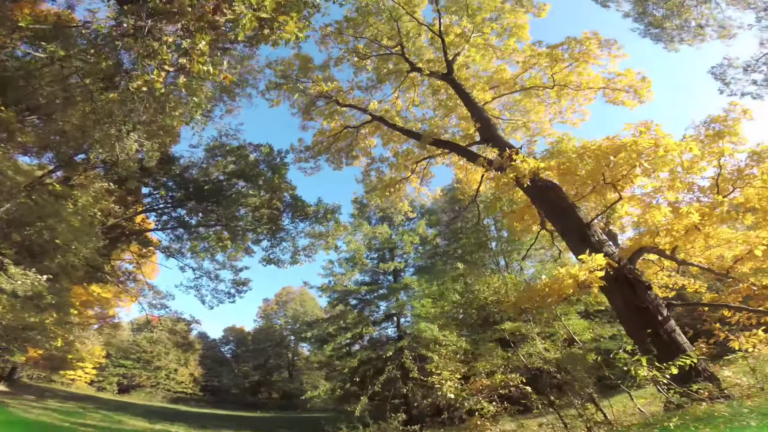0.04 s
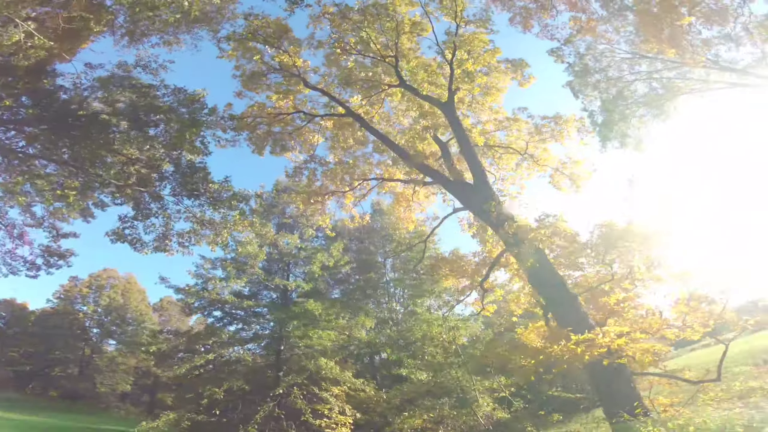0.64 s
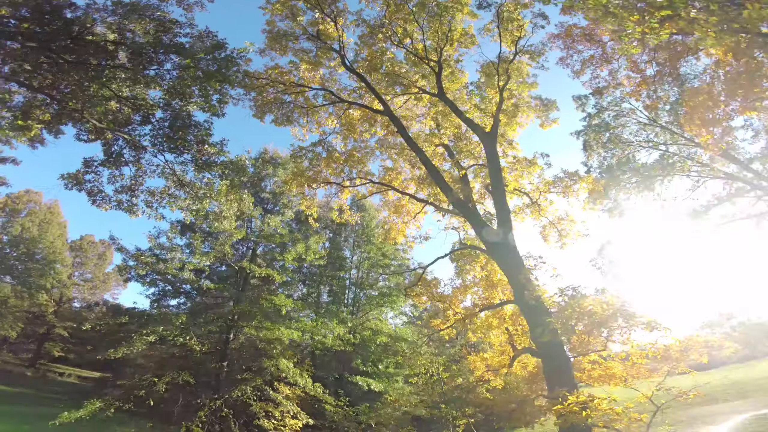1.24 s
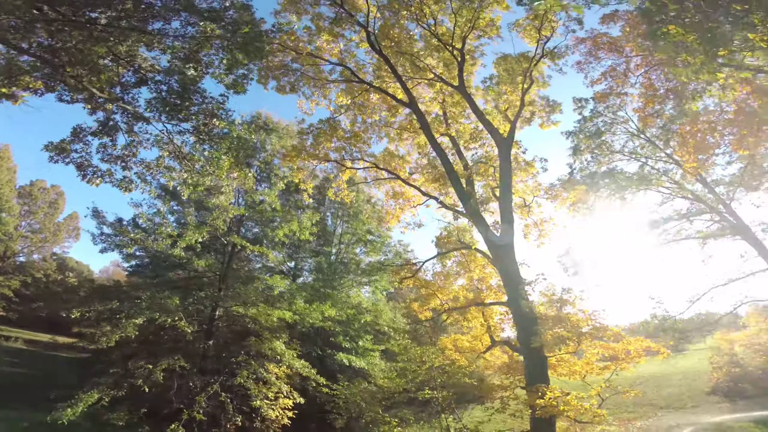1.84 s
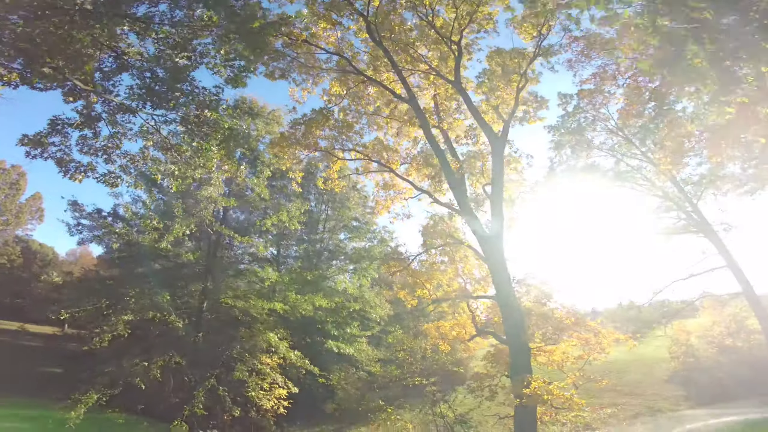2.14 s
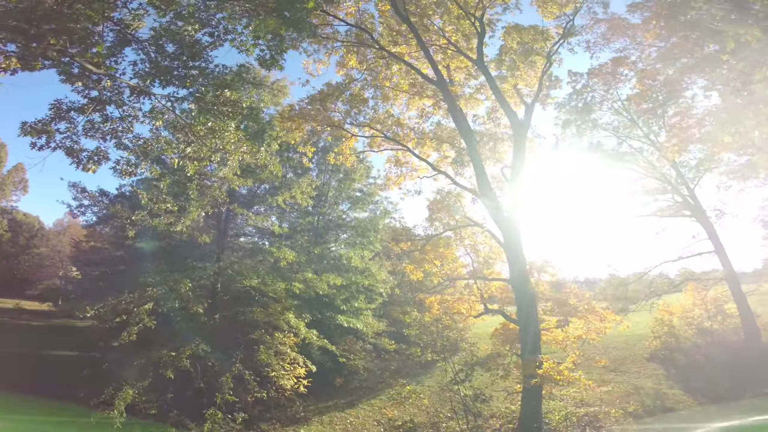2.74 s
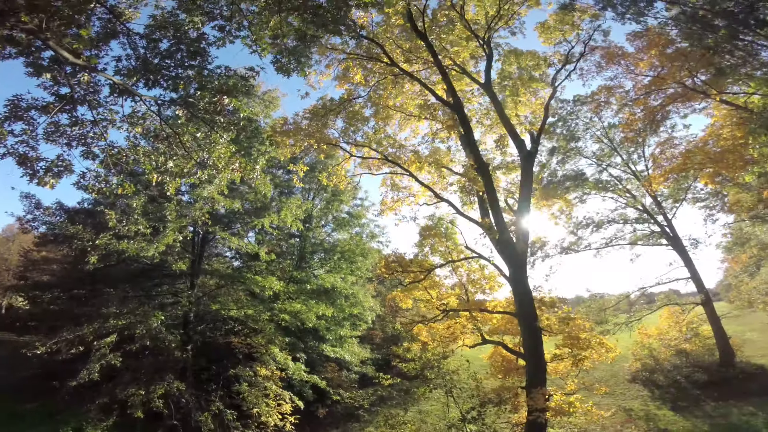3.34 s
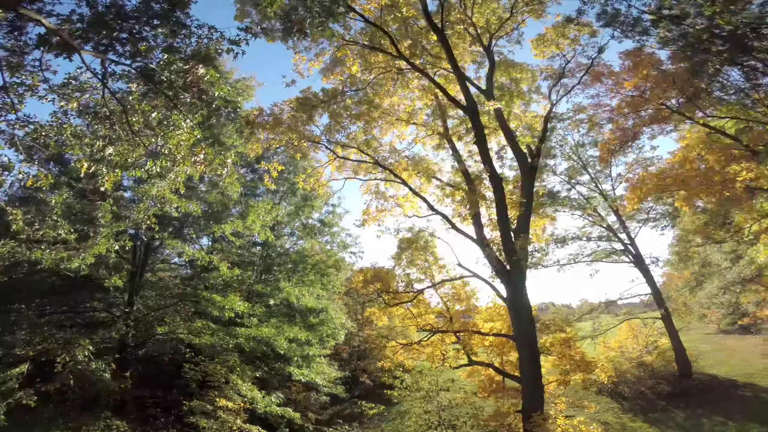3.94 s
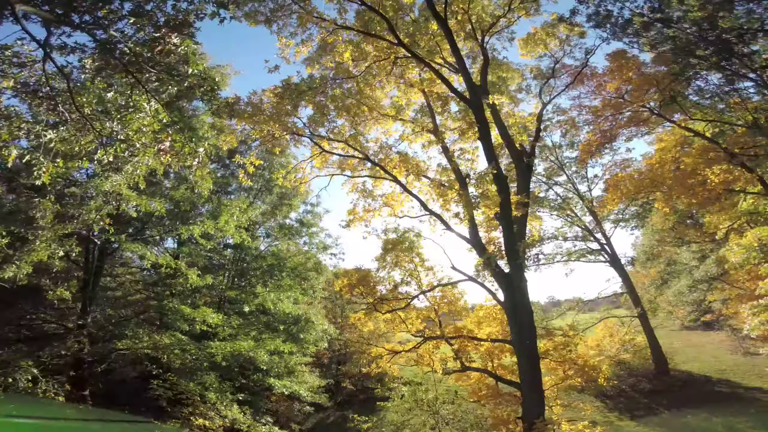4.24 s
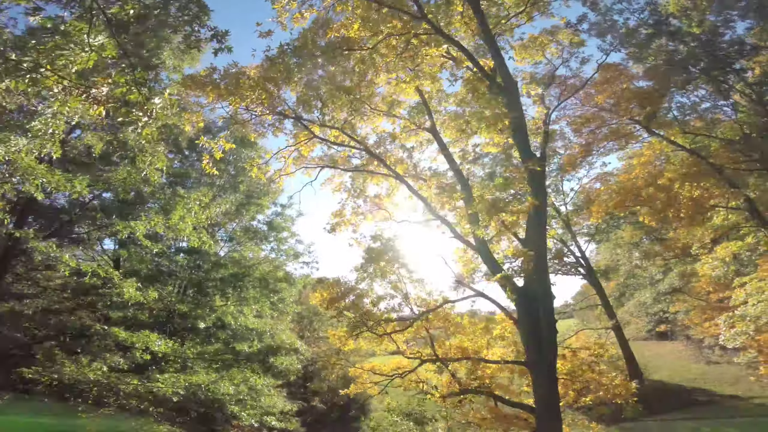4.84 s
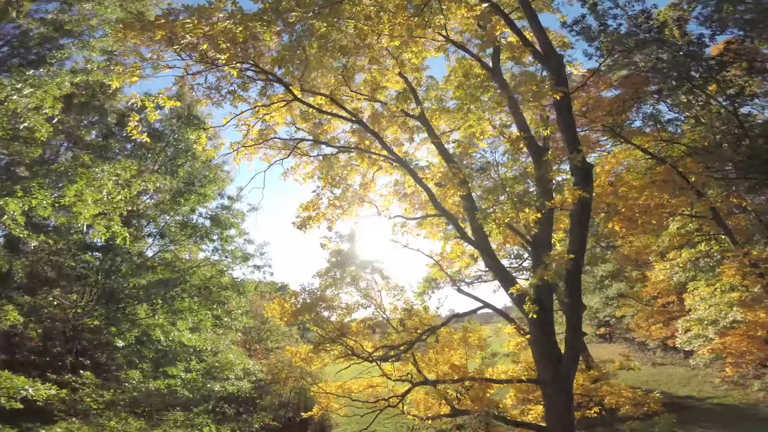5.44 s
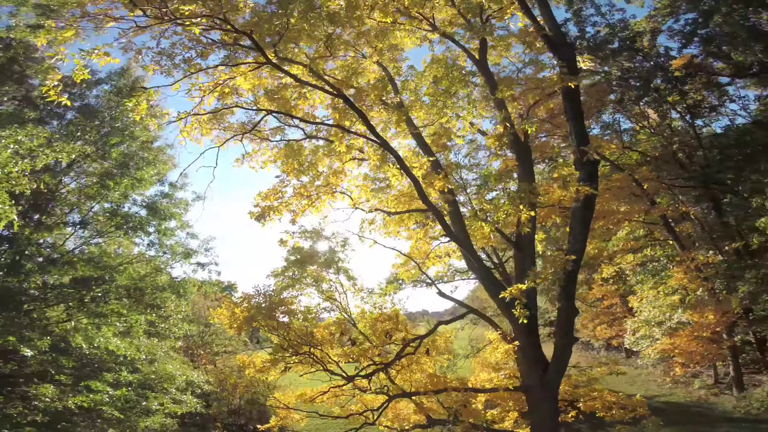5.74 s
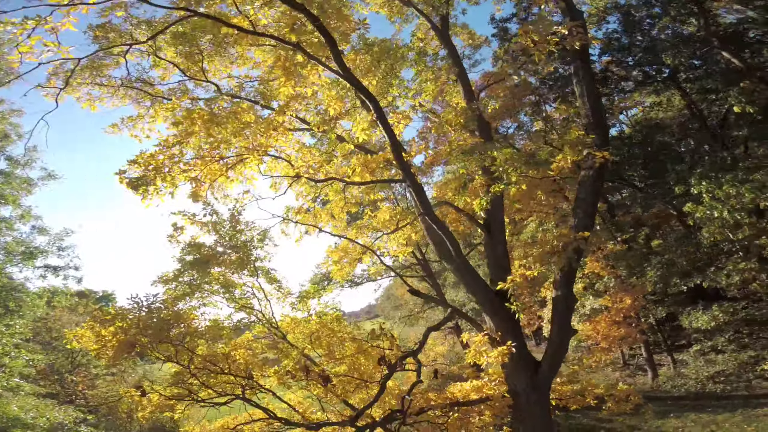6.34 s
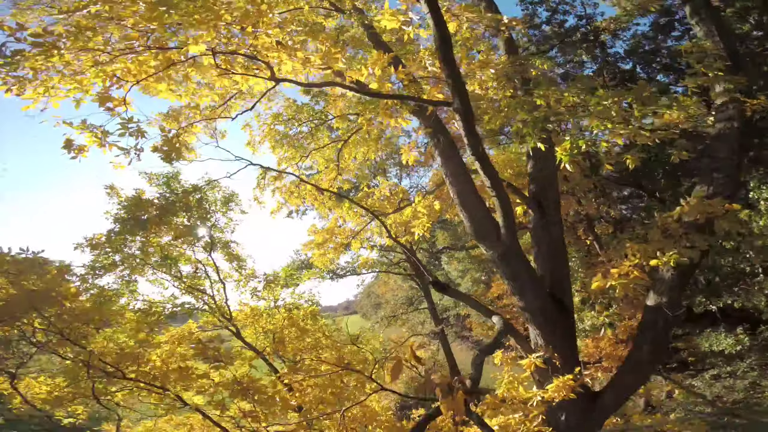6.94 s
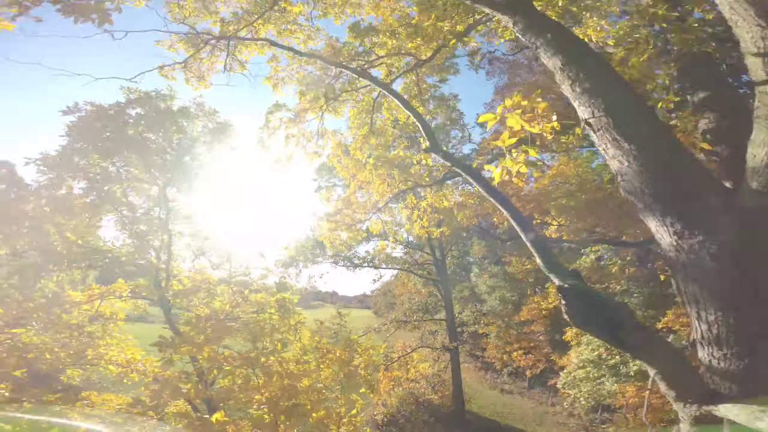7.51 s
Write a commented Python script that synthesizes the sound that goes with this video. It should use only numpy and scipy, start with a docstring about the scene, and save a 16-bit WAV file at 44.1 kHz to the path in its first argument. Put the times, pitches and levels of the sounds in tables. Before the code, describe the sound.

A small drone's propellers buzz and whine up close, wavering in pitch with the throttle, over low wind rumble.

```python
"""Outdoors among trees, riding with the camera on the frame of a small quadcopter in flight.
The throttle moves in steps; four motors at slightly different speeds shake the frame and beat against
each other. Their three-bladed propellers chop the air into low tones and a rasping buzz, and the magnets
add a thin whine. Wind rumbles on the microphone underneath, and the blade tips hiss on top."""
import sys
import numpy as np
from scipy import signal
from scipy.fft import rfft, irfft, next_fast_len
from scipy.io import wavfile
from scipy.ndimage import uniform_filter1d, minimum_filter1d, map_coordinates

SR = 44100
rng = np.random.default_rng(int(sys.argv[2]) if len(sys.argv) > 2 else 0)


def int16_out(signal):
    """Quantize to a 16-bit WAV file."""
    q = np.round(np.clip(np.atleast_2d(signal).T, -1, 1) * 32767)
    wavfile.write(sys.argv[1], SR, q.astype(np.int16))


N = 338247


def amp(db):
    """Decibels to gain."""
    return np.exp(np.asarray(db) * np.log(10) / 20)


def unit(x):
    """Scale to rms 1."""
    return x / np.sqrt(np.mean(x ** 2) + 1e-20)


def curves(rows):
    """One automation curve for each column after the time."""
    times, *columns = np.transpose(rows)
    return [np.interp(np.arange(N) / SR, times, column) for column in columns]


def wobble(rate):
    """Smooth random modulation, rate knots a second."""
    coarse = np.linspace(0, N, num=8192)
    knots = rng.standard_normal(8192)
    return np.interp(np.arange(N), coarse, map_coordinates(knots, [coarse * rate / SR], mode="wrap"))


def filtered(x, response):
    """Filter x by a gain given as a function of frequency."""
    size = next_fast_len(N + SR // 2)
    return irfft(rfft(x, size) * response(np.fft.rfftfreq(size, 1 / SR)), size)[:N]


def eq(x, points):
    """Shape x with an EQ curve of (frequency [Hz], gain [dB]) points."""
    freqs, db = np.transpose(points)
    return filtered(x, lambda hz: amp(np.interp(np.log(hz + 1), np.log(freqs), db)))


def noise(spectrum):
    """Noise of rms 1, coloured by an EQ curve."""
    return unit(eq(rng.standard_normal(N), spectrum))


def tone(angle):
    """A sinusoid of rms 1."""
    return np.sqrt(2) * np.cos(angle)


def overtones(angle, orders, smear, flutter_db):
    """Fluttering harmonics of one shaft, blurred by turbulence, the high ones most."""
    angle = angle + smear * wobble(110)
    return sum(amp(db + flutter_db * wobble(35)) * tone(round(k) * angle + rng.uniform(0, 2 * np.pi))
               for k, db in orders)


def chopped_noise(spectrum, angles, blade_db, turn_db, gust_db):
    """Turbulence that pulses with every blade, every turn of the first shaft and every gust."""
    passes = unit(sum(np.cos(3 * angle) for angle in angles))
    swell_db = blade_db * passes + turn_db * tone(angles[0]) + gust_db * wobble(35)
    return unit(amp(swell_db) * noise(spectrum))


# Throttle moves, each held until the next: (time [s], first motor's speed [turns/s], drift [turns/s^2])
THROTTLE_MOVES = [(0, 175, -12), (.33, 172, 12), (.58, 175, -5), (.99, 163, -6), (1.4, 165.5, 8),
                  (1.585, 178.5, 2), (2.125, 165, -3), (2.54, 173, 10), (2.75, 175, -13), (3.3, 167.7, 0),
                  (4.145, 157.5, -17), (4.36, 159.7, -4), (4.86, 163.3, 8), (5.15, 163.3, -3),
                  (5.75, 154, -7), (6.53, 160.5, 0), (7.18, 142, -13)]
# Detune from the first motor that holds the attitude and sets the beat rate: (time [s], lead [turns/s])
SECOND_DETUNE = [(0, 25.91), (.15, 24.75), (.6, 9.87), (1.35, 1.59), (1.5, 10.89), (1.65, 4.69),
                 (2.35, 4.07), (2.9, 10.55), (3.15, 15.75), (4, 21.99), (4.4, 21.45), (4.65, 24.61),
                 (5.3, 26.42), (5.8, 25.46), (6.55, 29.56), (7.05, 35.53), (7.67, 36.1)]
THIRD_DETUNE = [(0, 37), (.5, 37), (1, 18), (1.3, 12), (1.7, -9), (2.05, -8), (2.25, 8), (2.7, 5),
                (3.3, 21), (5, 35), (5.65, 30), (5.85, 50), (6.45, 51), (7.05, 41), (7.67, 46)]
FOURTH_DETUNE = [(0, -17), (.2, -9), (.42, 1), (6.45, 2), (7.1, 7), (7.67, 4)]

def motor_speeds(spool_s=.018):
    """Turns per second of four motors: the first glides after the throttle, the rest lead or trail it."""
    t = np.arange(N) / SR
    moves = np.array(THROTTLE_MOVES)
    start, target, drift = moves[np.searchsorted(moves[:, 0], t, side="right") - 1].T
    demand = target + drift * (t - start)
    lag = np.exp(-1 / (spool_s * SR))
    first = demand[0] + signal.lfilter([1 - lag], [1, -lag], demand - demand[0])
    return [first] + [first + curves(lead)[0] for lead in (SECOND_DETUNE, THIRD_DETUNE, FOURTH_DETUNE)]


# Airflow through the propellers:
# (time [s], clean bite over wash [dB], shaft-angle churn [rad], body level [dB], hiss level [dB])
AIRFLOW = [(0, 1, 0.11, -23, -33.5), (.35, -4, 0.038, -27.5, -33), (.9, 1.5, .04, -28.5, -32.5),
           (1.08, 1.5, 0.069, -27.5, -31.5), (1.47, 1, 0.06, -24.5, -29.5), (2.1, 0.5, 0.035, -28.5, -32),
           (2.45, 4.5, 0.034, -26, -31.5), (2.7, 0.5, .05, -27, -29.5), (4.05, 3, 0.056, -26, -31),
           (4.35, -3, .04, -25, -30.5), (5.7, 2, 0.049, -25.5, -30.5), (6.35, -1, .06, -21, -30.5),
           (6.7, -0.5, 0.061, -25, -31.5), (7.17, 3, .07, -21.5, -31), (7.3, -6, .075, -24, -32),
           (7.67, -9, 0.036, -24.5, -29)]

def propeller_bites(speeds):
    """How hard each propeller bites: load shifts to the second as it leads; the fourth works to catch up."""
    bite_db = curves(AIRFLOW)[0]
    shift_db = 0.1778 * (speeds[1] - speeds[0])
    catch_up_db = 0.9 * np.maximum(speeds[0] - speeds[3], 0)
    trims_db = [2 - shift_db, -6.5 + shift_db, -6, -4.5 + catch_up_db]
    return amp([bite_db + trim for trim in trims_db])


# How the frame passes on the shake of the first two motors: (speed [turns/s], level [dB])
FIRST_SHAKE = [(136, -17), (149, -12), (155, -10), (162, -13), (168, -13), (174, -12), (180, -9.5)]
SECOND_SHAKE = [(162, -20.5), (172, -20), (182, -14.5), (187, -12), (196, -11.5), (203, -17)]

def frame_hum(speeds, angles, bites):
    """Unbalanced rotors shake the frame once a turn; rough air makes the hum ragged."""
    _, churn, _, hiss_db = curves(AIRFLOW)
    load = amp(0.69 * (hiss_db - hiss_db.mean()))  # the airflow loads the arms
    levels_db = [np.interp(speeds[0], *np.transpose(FIRST_SHAKE)),
                 np.interp(speeds[1], *np.transpose(SECOND_SHAKE)),
                 curves(SECOND_THIRD_BLADE_LEVELS)[1] + 0.5,  # the third follows its blade tone
                 -27]  # the fourth is well balanced
    shakes = [load * amp(db + 1.8 * unit(churn) * wobble(25)) * tone(angle)
              for db, angle in zip(levels_db, angles)]
    # the mount gives more one way than the other, adding an octave on each beat of the first two motors
    octave = filtered((shakes[0] + shakes[1]) ** 2, lambda hz: hz > 250)
    # under load the first arm also flexes twice a turn
    flex = load ** 2 * bites[0] * amp(-41 + 3.1 * wobble(17)) * tone(2 * angles[0])
    return sum(shakes) + amp(-16.5) * octave + flex


# Fader ride on the first propeller's blade tone: (time [s], level [dB])
FIRST_BLADE_LEVEL = [(0, -19.5), (.68, -13), (1.4, -17), (2.2, -15.5), (3.6, -16), (4.2, -23), (4.8, -19),
                     (5.1, -23.5), (5.96, -30.5), (6.17, -20), (6.26, -26.5), (6.37, -13.5), (6.5, -18.5),
                     (6.8, -29), (7.2, -25.5), (7.3, -18.5), (7.67, -15.5)]
# Fader rides on the next two: (time [s], second's level [dB], third's level [dB])
SECOND_THIRD_BLADE_LEVELS = [(0, -24, -25), (.3, -20.5, -21), (.45, -28, -20), (.95, -32, -21),
                             (1.1, -46, -38), (1.55, -33, -36), (1.66, -30, -23.5), (2.08, -23, -21),
                             (2.3, -32, -28.5), (2.9, -35, -45), (3.5, -24.5, -30), (4.05, -24, -31),
                             (4.3, -25, -35), (5, -23, -25.5), (5.55, -27.5, -32), (5.9, -28, -37),
                             (6.45, -21.5, -26), (6.7, -29.5, -24), (7.15, -27, -28), (7.35, -30, -30)]

def blade_tones(angles, bites):
    """Three blades a turn push a clean tone out of each propeller."""
    first, second, third = amp(curves(FIRST_BLADE_LEVEL) + curves(SECOND_THIRD_BLADE_LEVELS))
    fourth = amp(-14) * first * bites[3] / bites[0]
    return sum(gain * amp(.7 * wobble(30)) * tone(3 * angle)
               for gain, angle in zip([first, second, third, fourth], angles))


# Harmonics of the blade slap: (multiple of the shaft rate, level [dB])
BUZZ_HARMONICS = [(4, -9.5), (5, -10), (7, -11.5), (8, -24.5), (9, -7.5), (10, -30), (11, -18), (12, -8),
                  (13, -13), (14, -13.5), (15, -10), (16, -24.5), (17, -22), (18, -11.5), (21, -10.5),
                  (24, -15.5), (27, -20)]
# EQ of the path from the propellers into the camera's case: (frequency [Hz], gain [dB])
CASE_EQ = [(300, 9.5), (750, -5), (900, -4.5), (1200, -2), (1350, -2.5), (1600, -3), (2200, -4.5),
           (2600, -5), (3100, -7.5), (3800, -16), (5000, -1)]
# Colour of the propeller wash: (frequency [Hz], level [dB])
WASH_SPECTRUM = [(100, -27), (250, -1.5), (330, 4), (450, 2.5), (630, 4), (780, -4.5), (1150, 2),
                 (1400, -4), (2000, -2), (2600, -13.5), (3200, -14), (3900, -36), (6000, -56), (11000, -62)]

def blade_buzz(angles, bites, crossover_hz=1400):
    """Blades slap the air over the arms: a pitched buzz when they bite, a wash when the flow breaks up."""
    _, churn, body_db, hiss_db = curves(AIRFLOW)
    buzz = sum(bite * overtones(angle, BUZZ_HARMONICS, smear=churn, flutter_db=2.5)
               for bite, angle in zip(bites, angles))
    # the octave of the blade tone survives the churning air
    octave = sum(bite * amp(2 * wobble(30)) * tone(6 * angle) for bite, angle in zip(bites, angles))
    pitched = eq(amp(-1.5) * buzz + amp(-7.5) * octave, CASE_EQ)
    wash = chopped_noise(WASH_SPECTRUM, angles, blade_db=2.5, turn_db=0.5, gust_db=.5)
    air = (pitched + wash) / np.sqrt(1 + np.sum(bites ** 2, axis=0) / 2)  # the two share the power
    body = filtered(air, lambda hz: 1 / (1 + (hz / crossover_hz) ** 8))
    rasp = air - body
    return amp(body_db + 5) * body + amp(hiss_db + 7.5 + .7 * wobble(6.2)) * rasp


# Magnets passing the stator teeth: (multiple of the shaft rate, level [dB])
WHINE_HARMONICS = [(28, 5), (36, -23), (40, -20), (42, -6.5)]
# Resonances of the motor bells: (centre [Hz], width [Hz], gain [dB])
BELL_RESONANCES = [(5385, 50, -4), (5900, 470, -2.5), (6800, 1000, -2)]

def magnet_whine(angles, trims_db=(0.5, -3, -8, -4.5)):
    """The magnets' thin whine swells with the hiss and flares where it crosses a motor bell's resonance."""
    def bells(hz):
        return sum((-1) ** k * amp(db) * 1j * hz * width / (centre ** 2 - hz ** 2 + 1j * hz * width)
                   for k, (centre, width, db) in enumerate(BELL_RESONANCES))

    hiss_db = curves(AIRFLOW)[3]
    whine = sum(amp(db) * overtones(angle, WHINE_HARMONICS, smear=0.014, flutter_db=1)
                for db, angle in zip(trims_db, angles))
    return amp(-35 + 2.2 * (hiss_db - hiss_db.mean())) * filtered(whine, bells)


# Fader ride on the wind: (time [s], level [dB])
WIND_LEVEL = [(0, -23), (1.2, -30), (1.6, -31), (4.43, -34), (4.52, -27), (4.8, -22.5), (4.95, -37.5),
              (5.4, -34), (6.3, -31), (7.2, -32.5), (7.67, -24.5)]
# Colour of its rumble: (frequency [Hz], level [dB])
WIND_SPECTRUM = [(15, -11), (35, 4), (70, 0), (120, 1.5), (200, 3), (270, -20.5), (600, -47), (2000, -88)]

def wind_rumble(gust_db=2, gusts_per_s=9):
    """Wind buffets the microphone in quick, low gusts."""
    wind_db, = curves(WIND_LEVEL)
    return amp(wind_db + 4.5 + gust_db * wobble(gusts_per_s)) * noise(WIND_SPECTRUM)


# Colour of the air at the blade tips: (frequency [Hz], level [dB])
HISS_SPECTRUM = [(2120, -47), (3600, -12.5), (4200, -11), (6890, 0.5), (7750, -5.5), (9930, -10),
                 (10400, -15), (11000, -22), (14300, -53), (22000, -120)]

def tip_hiss(angles):
    """The blade tips cut the air with a bright, lightly pulsing hiss."""
    hiss_db = curves(AIRFLOW)[3]
    hiss = chopped_noise(HISS_SPECTRUM, angles, blade_db=0.2, turn_db=-0.9, gust_db=0.3)
    return amp(hiss_db - 0.9) * hiss


def scene():
    """The mono mix: four shafts drive every layer but the wind."""
    speeds = motor_speeds()
    # the flight controller keeps nudging every shaft
    angles = [2 * np.pi * np.cumsum(speed) / SR + 0.073 * wobble(24) for speed in speeds]
    bites = propeller_bites(speeds)
    rotors = frame_hum(speeds, angles, bites) + blade_tones(angles, bites) + blade_buzz(angles, bites)
    return (rotors + magnet_whine(angles) + wind_rumble() + tip_hiss(angles))[None]


def record(dry):
    """The camera's limiter ducks the crests of the beats, and its band limit cuts off the top end."""
    ceiling, window_samples, top_hz = 0.91, 400, 10900
    needed = np.minimum(1, ceiling / (np.abs(dry[0]) + 1e-9))
    gain = uniform_filter1d(minimum_filter1d(needed, window_samples), window_samples)
    return filtered(dry[0] * gain, lambda hz: hz < top_hz)[None]


dry = scene()
out = record(dry)
int16_out(out)
```